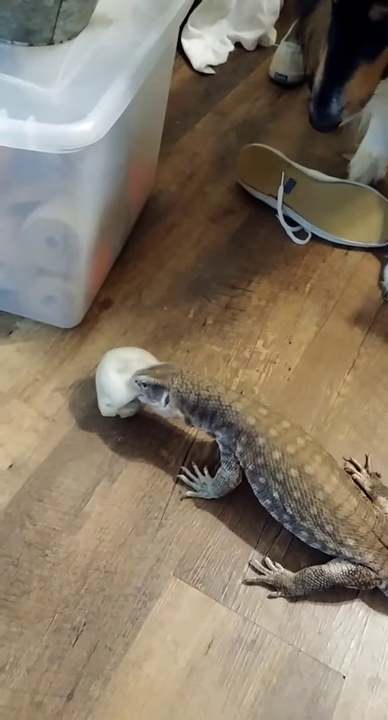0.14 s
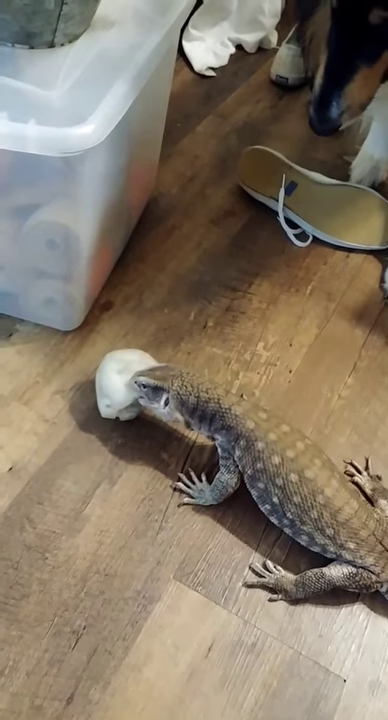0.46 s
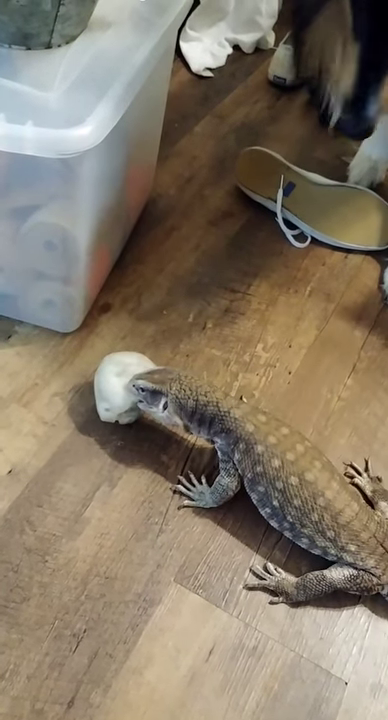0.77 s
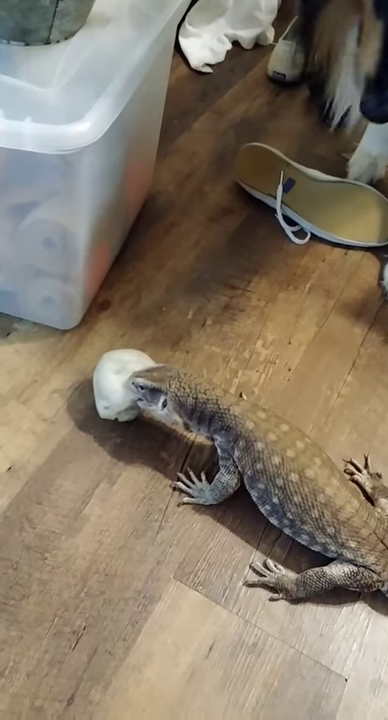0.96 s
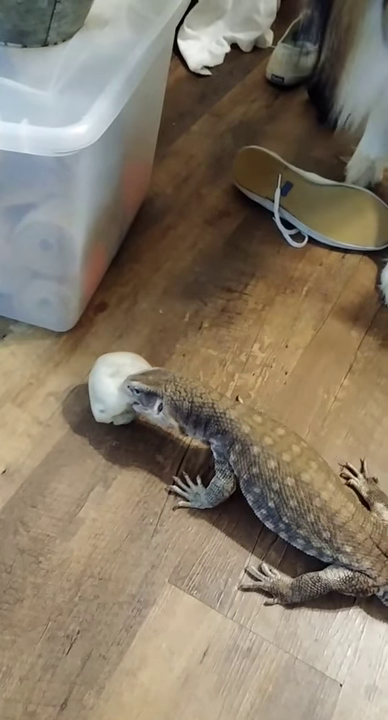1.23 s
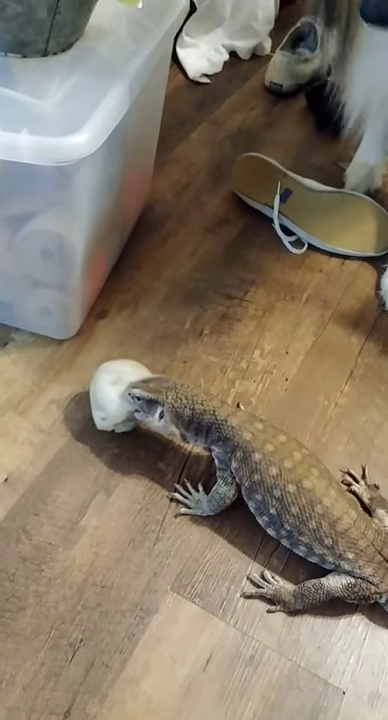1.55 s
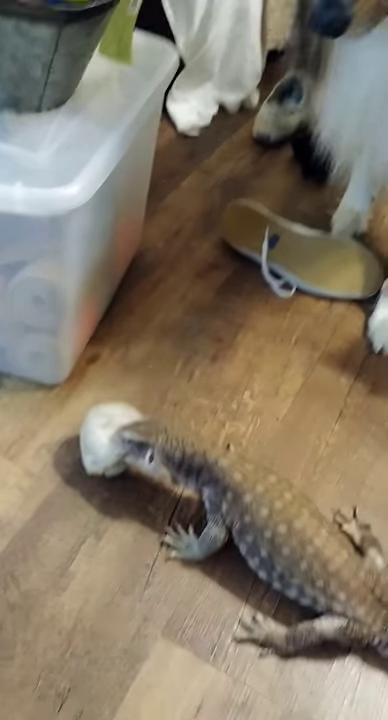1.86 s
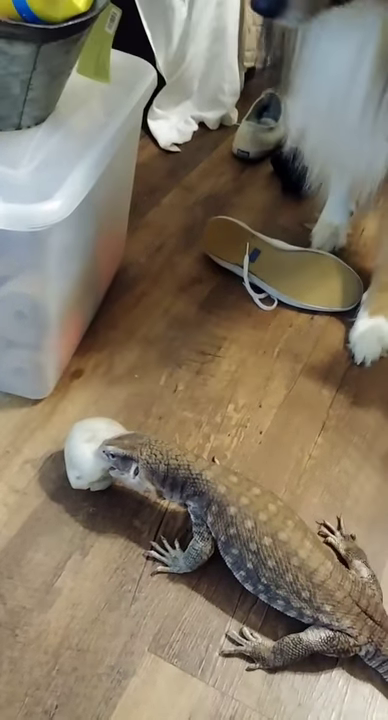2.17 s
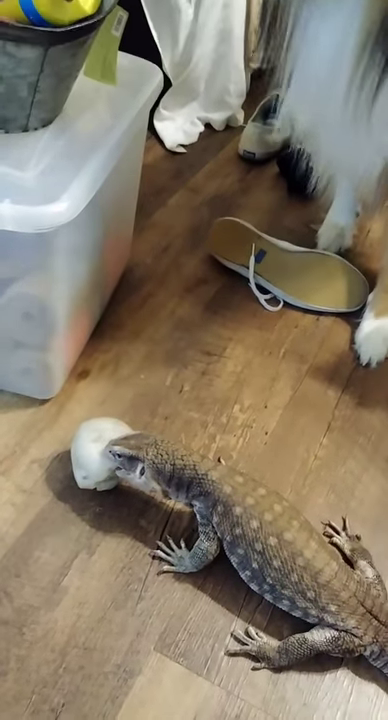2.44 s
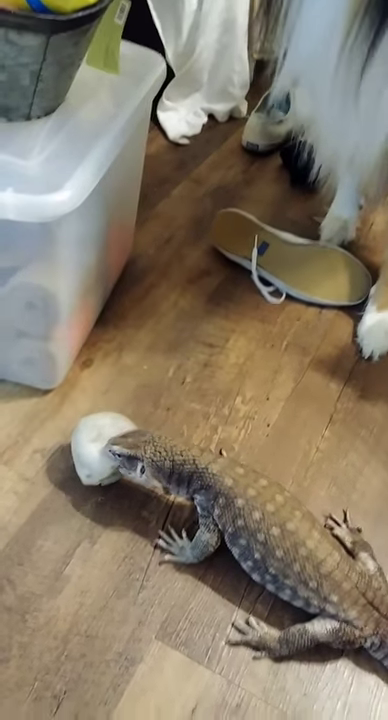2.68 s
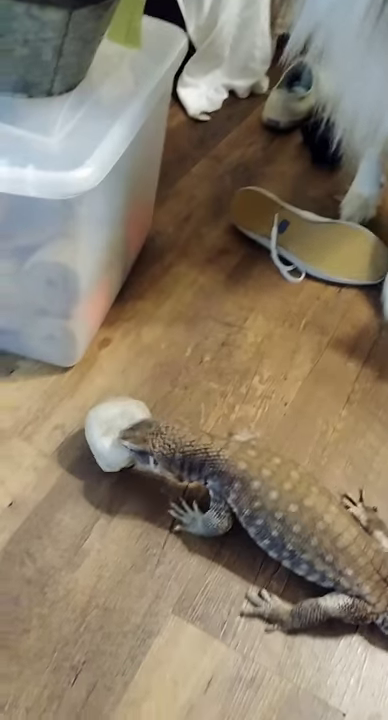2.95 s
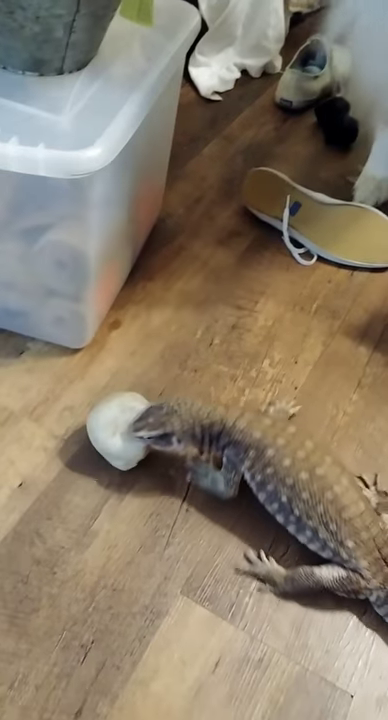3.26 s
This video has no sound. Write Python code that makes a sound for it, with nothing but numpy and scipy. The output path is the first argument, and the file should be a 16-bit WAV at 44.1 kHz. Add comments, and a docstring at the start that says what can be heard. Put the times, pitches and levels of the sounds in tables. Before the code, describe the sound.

Thin, fluttering lizard hiss fades into a quiet, rumbling room with occasional dull thuds; finally a foot brushes and scales rasp louder over the wood floor with claw clicks. Close handheld microphone, bright treble colouring.

```python
"""Deep room rumble, a drone, faint air noise and a soft hiss that fades: all are shaped noise.
Dull low bumps in the rumble are brief decaying low tones. A monitor lizard with an egg in its jaws lies
on a wooden floor: claw ticks are short noise bursts, mostly late. Near the end scales scrape over the
boards (noise plus random catches) and a foot brushes once (a noise swish).
A microphone resonance colours every noise."""
import sys
import numpy as np
from scipy import signal
from scipy.fft import rfft, irfft
from scipy.io import wavfile

SR = 44100
rng = np.random.default_rng(int(sys.argv[2]) if len(sys.argv) > 2 else 0)


def log_audio(samples):
    """Write samples as a 16-bit WAV file to the path given in sys.argv[1]."""
    # one column per channel
    frames = np.atleast_2d(samples).T
    # limit to full scale, then quantise
    limited = np.clip(frames, -1, 1)
    pcm = np.round(limited * 32767).astype(np.int16)
    wavfile.write(sys.argv[1], SR, pcm)


N = 150381
TIME_S = np.arange(N) / SR


def from_db(db):
    """Decibels to amplitude gain."""
    return 10 ** (np.asarray(db) / 20)


def rms_one(x):
    """Scale to unit power."""
    return x / np.sqrt(np.mean(x ** 2) + 1e-20)


def in_time(rows):
    """Join (time [s], value) points by straight lines."""
    return np.interp(TIME_S, *np.transpose(rows))


def drift(corner_hz):
    """Random modulation of unit RMS: white noise through two equal low-pass poles."""
    pole = np.exp(-2 * np.pi * corner_hz / SR)
    white = rng.standard_normal(N + SR)
    smooth = signal.lfilter([1], [1, -2 * pole, pole * pole], white)
    return rms_one(smooth[SR:])  # first second dropped: filter settling


MIC_HZ, MIC_WIDTH_HZ, MIC_BOOST_DB = 7640, 1250, 11.5


def coloured(x, colour):
    """Shape x by a spectrum and the microphone's narrow treble resonance; unit power."""
    hz, db = np.transpose(colour)
    bin_hz = np.maximum(np.arange(N // 2 + 1) * SR / N, 1)
    gain = from_db(np.interp(np.log(bin_hz), np.log(hz), db))
    shaped = irfft(rfft(x) * gain, N)
    b, a = signal.iirpeak(MIC_HZ, MIC_HZ / MIC_WIDTH_HZ, fs=SR)
    resonance = signal.lfilter(b, a, shaped)
    return rms_one(shaped + (from_db(MIC_BOOST_DB) - 1) * resonance)


def noise(colour):
    """Gaussian noise of a given colour, unit power."""
    return coloured(rng.standard_normal(N), colour)


# rumble spectrum before the microphone: (frequency [Hz], relative density [dB per Hz])
RUMBLE_COLOUR = [(20, -39), (27, -26), (36, -3), (52, 4.5), (65, -8.5), (75, 1), (84, -10.5), (98, 4),
                 (110, -1.5), (126, 1.5), (145, -1), (165, -15.5), (230, -31), (400, -60)]
# rumble strength before swells: (time [s], level [dB])
RUMBLE_LEVEL = [(0, -49), (.3, -48.5), (.42, -53), (.6, -51), (.8, -54), (.96, -47), (1.2, -50),
                (1.28, -51.5), (1.42, -49), (1.56, -58.5), (1.66, -50), (2.1, -53), (2.28, -49), (2.6, -51),
                (2.83, -53), (2.92, -47.5), (3.17, -50.5), (3.3, -46.5), (3.41, -56)]
RUMBLE_SWELL_DB, RUMBLE_SWELL_HZ = 1.5, 24


def rumble():
    """Low-frequency noise with an uneven, randomly swelling level."""
    level_db = in_time(RUMBLE_LEVEL) + RUMBLE_SWELL_DB * drift(RUMBLE_SWELL_HZ)
    return from_db(level_db) * noise(RUMBLE_COLOUR)


# air spectrum before the microphone: (frequency [Hz], relative density [dB per Hz])
AIR_COLOUR = [(200, 5), (580, 10.5), (770, 4.5), (940, 10.5), (1150, 5.5), (1600, 3.5), (3000, 1.5),
              (5000, -0.5), (7500, -9.5), (10000, -3), (15500, -0.5)]
AIR_DB, AIR_FLICKER_DB, AIR_FLICKER_HZ = -61.5, 1.33, 35


def air():
    """Faint broadband noise whose level flickers a little."""
    level_db = AIR_DB + AIR_FLICKER_DB * drift(AIR_FLICKER_HZ)
    return from_db(level_db) * noise(AIR_COLOUR)


# drone spectrum before the microphone: (frequency [Hz], relative density [dB per Hz])
DRONE_COLOUR = [(100, -23), (170, -1.5), (205, -0.5), (226, 1), (248, -9), (270, -3), (303, -1.5),
                (335, -7.5), (410, -15.5), (445, -5.5), (490, -17), (750, -20.5), (1500, -48), (4000, -77)]
DRONE_DB = -61.5


def drone():
    """Steady noise of the room, strongest above the rumble."""
    return from_db(DRONE_DB) * noise(DRONE_COLOUR)


# hiss strength before flutter: (time [s], level [dB])
HISS_LEVEL = [(0, -50), (.08, -54.5), (.22, -52.5), (.27, -55.5), (.38, -52), (.45, -56), (.62, -57.5),
              (.7, -60.5), (.86, -61), (.97, -58.5), (1.05, -66), (1.19, -58), (1.28, -68.5), (1.44, -60),
              (1.56, -70.5), (1.66, -67), (1.8, -66), (2.05, -77), (2.64, -74), (2.74, -68), (2.83, -79)]
# hiss spectrum before the microphone: (frequency [Hz], relative density [dB per Hz])
HISS_COLOUR = [(400, -1.5), (1000, -1), (2000, -2.5), (3400, -3), (5000, 1), (5700, 0), (6700, 2),
               (7600, 2), (8400, 1.5), (9400, -3), (12500, -6), (15000, -3)]
HISS_FLUTTER_DB, HISS_FLUTTER_HZ = 1.5, 35


def hiss():
    """Thin noise, slightly fluttering, that dies away unevenly."""
    level_db = in_time(HISS_LEVEL) + HISS_FLUTTER_DB * drift(HISS_FLUTTER_HZ)
    return from_db(level_db) * noise(HISS_COLOUR)


# dull low bumps: (time [s], base level [dB], extra level of the deepest tone [dB])
BUMPS = [(0.299, -48, 4), (0.496, -52.5, 11), (1.071, -49, -8), (1.155, -39, -10), (2.53, -41, -8.5),
         (2.74, -42.5, 1), (3.269, -48.5, -2)]
# bump tones, deepest first: (frequency [Hz], relative level [dB], T60 [s])
BUMP_TONES = [(50.5, 3.5, .14), (122, 3, 0.1), (204, -8, 0.088)]
BUMP_RISE_S = 0.0038  # onset time constant


def bumps():
    """Dull low bumps in the rumble: brief low sines with a soft onset and exponential decay."""
    out = np.zeros(N)
    for start_s, base_db, deep_db in BUMPS:
        age_s = np.maximum(TIME_S - start_s, 0)
        onset = 1 - np.exp(-age_s / BUMP_RISE_S)
        for k, (hz, tone_db, t60_s) in enumerate(BUMP_TONES):
            extra_db = deep_db if k == 0 else 0
            decay = from_db(base_db + tone_db + extra_db - 60 * age_s / t60_s)
            out += decay * onset * np.sin(2 * np.pi * hz * age_s)
    return out


# claw contacts: (time [s], edge level before envelope [dB], wood relative to edge [dB])
TICKS = [(0.383, -46, -20), (2.865, -55, -5), (3.183, -41, -8), (3.241, -43.5, 1.5), (3.352, -47, 0.5),
         (3.375, -45, 1)]
# sharp edge before the microphone: (frequency [Hz], relative density [dB per Hz])
EDGE_COLOUR = [(3000, -29), (7000, -2), (9000, 4), (11000, 2), (13000, -6), (15500, -1)]
# wood under it, before the microphone: (frequency [Hz], relative density [dB per Hz])
WOOD_COLOUR = [(500, -13.5), (1400, -1.5), (3000, -4.5), (5000, -8), (7500, -18), (15000, -28)]
TICK_RISE_S, TICK_FALL_S = 0.00062, 0.0046  # linear rise, decay time constant


def ticks():
    """Each claw contact is a few-millisecond burst: a bright edge plus its own share of wood."""
    edge, wood = noise(EDGE_COLOUR), noise(WOOD_COLOUR)
    out = np.zeros(N)
    for start_s, edge_db, wood_db in TICKS:
        age_s = np.maximum(TIME_S - start_s, 0)
        envelope = np.minimum(age_s / TICK_RISE_S, 1) * np.exp(-age_s / TICK_FALL_S)
        out += from_db(edge_db) * envelope * (edge + from_db(wood_db) * wood)
    return out


# force of the scales on the boards, before judder: (time [s], level [dB])
SLIDE_FORCE = [(2.86, -83), (2.9, -58.5), (2.95, -54.5), (3.02, -52.5), (3.13, -52.5), (3.17, -50.5),
               (3.2, -49.5), (3.23, -43), (3.28, -46), (3.32, -44), (3.36, -40.5), (3.41, -44)]
# light slide before the microphone: (frequency [Hz], relative density [dB per Hz])
LIGHT_COLOUR = [(400, -8), (800, -4), (1250, 7), (1850, 1), (2600, -6), (4000, -2), (6300, -3.5), (7500, 1),
                (9000, 0), (11000, -5.5), (15500, -6.5)]
# hard slide before the microphone: (frequency [Hz], relative density [dB per Hz])
HARD_COLOUR = [(400, -5), (800, -7), (1250, 5.5), (1900, 2.5), (2800, -2), (4400, -2.5), (5400, 2.5),
               (6500, -2), (7500, 0.5), (9000, 4), (11000, -3.5), (15500, -4)]
HARD_FROM_DB, HARD_SPAN_DB = -47, 5  # light-to-hard crossfade
CATCHES_PER_S, CATCH_SPREAD_DB, CATCH_POWER_SHARE = 2300, 2.5, 0.45
JUDDER_DB, JUDDER_HZ = 1, 55


def scrape():
    """Scales rub (noise) and catch on the grain (random impulses); force sets level and colour."""
    force_db = in_time(SLIDE_FORCE)
    size_db = CATCH_SPREAD_DB * np.minimum(rng.exponential(1, N), 4)
    sizes = from_db(size_db) * rng.choice([-1, 1], N)
    catches = rms_one(sizes * (rng.random(N) < CATCHES_PER_S / SR))
    rub = rng.standard_normal(N)
    friction = np.sqrt(CATCH_POWER_SHARE) * catches + np.sqrt(1 - CATCH_POWER_SHARE) * rub
    hard = np.clip((force_db - HARD_FROM_DB) / HARD_SPAN_DB, 0, 1)
    light_sound = (1 - hard) * coloured(friction, LIGHT_COLOUR)
    hard_sound = hard * coloured(friction, HARD_COLOUR)
    return from_db(force_db + JUDDER_DB * drift(JUDDER_HZ)) * (light_sound + hard_sound)


# foot swish before the microphone: (frequency [Hz], relative density [dB per Hz])
BRUSH_COLOUR = [(700, -11), (1200, 0), (2000, -1), (3200, -4), (4600, -8), (6000, -8), (8000, -17),
                (15000, -23)]
BRUSH_PEAK_S, BRUSH_DB = 2.947, -52
BRUSH_RISE_S, BRUSH_FALL_S = 0.029, 0.016  # Gaussian sigmas


def brush():
    """One short, duller foot swish: noise under a lopsided Gaussian."""
    age_s = TIME_S - BRUSH_PEAK_S
    sigma_s = np.where(age_s < 0, BRUSH_RISE_S, BRUSH_FALL_S)
    envelope = np.exp(-.5 * (age_s / sigma_s) ** 2)
    return from_db(BRUSH_DB) * envelope * noise(BRUSH_COLOUR)


ECHO_DB, ECHO_T60_S = -10, 0.15


def room(x):
    """Add quickly dying reflections: convolution with decaying noise of unit energy."""
    age_s = TIME_S[:SR // 2]
    tail = rng.standard_normal(len(age_s)) * from_db(-60 * age_s / ECHO_T60_S)
    echo = signal.fftconvolve(x, tail / np.linalg.norm(tail))[:N]
    return x + from_db(ECHO_DB) * echo


def scene():
    """Sum all sources; only scrape, brush and ticks get reflections; both channels alike."""
    fading_hiss = hiss()
    contacts = room(scrape() + brush() + ticks())
    background = rumble() + air() + drone()
    mono = fading_hiss + contacts + bumps() + background
    return np.stack([mono, mono])


LOW_CUT_HZ, HIGH_CUT_HZ = 26, 15680


def record(dry):
    """Roll off the deepest bass and cut the top steeply."""
    low_cut = signal.butter(3, LOW_CUT_HZ, "high", fs=SR, output="sos")
    high_cut = signal.ellip(12, .1, 70, HIGH_CUT_HZ, fs=SR, output="sos")  # ripple, stopband [dB]
    return signal.sosfilt(high_cut, signal.sosfilt(low_cut, dry))


dry = scene()
out = record(dry)
log_audio(out)
```